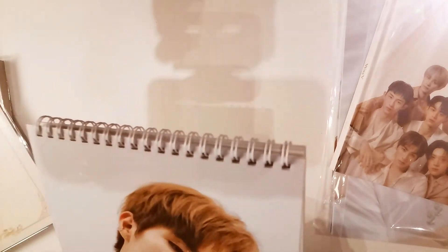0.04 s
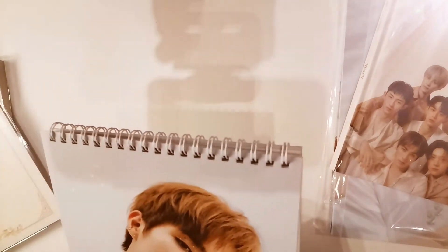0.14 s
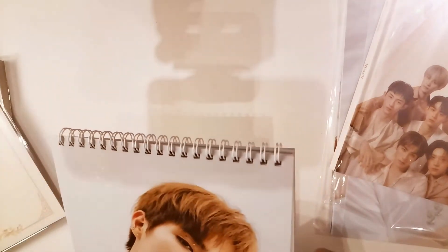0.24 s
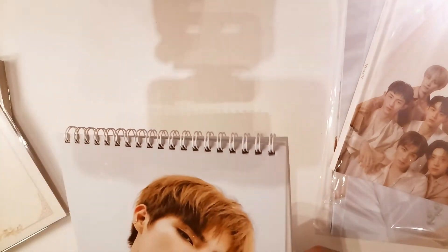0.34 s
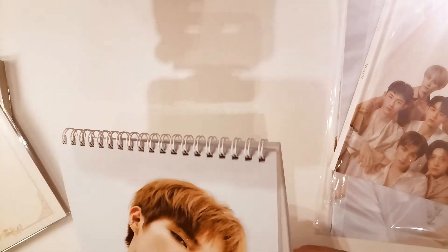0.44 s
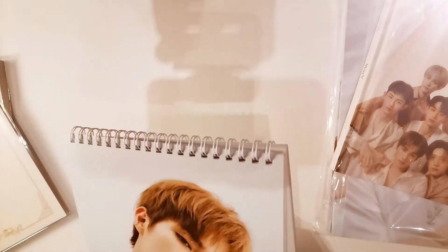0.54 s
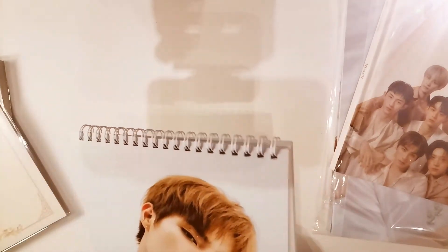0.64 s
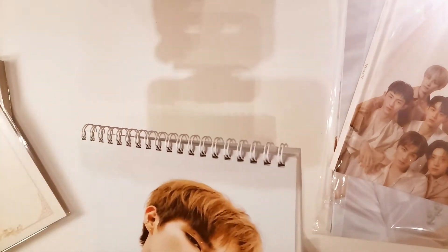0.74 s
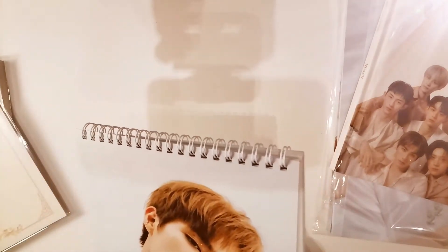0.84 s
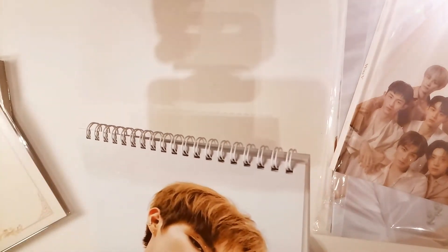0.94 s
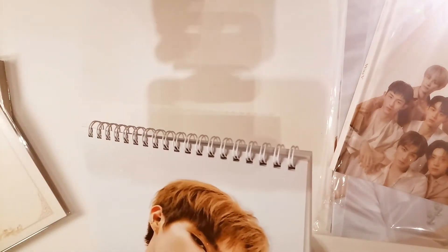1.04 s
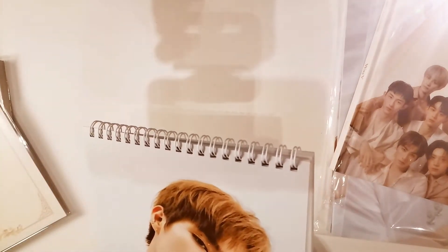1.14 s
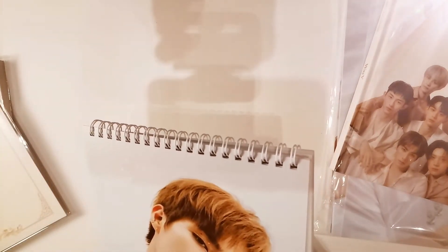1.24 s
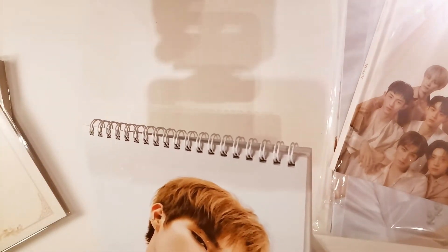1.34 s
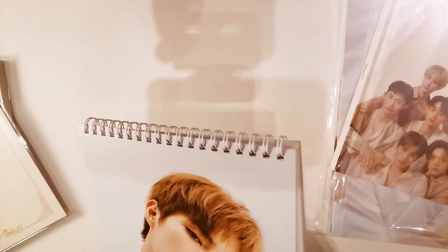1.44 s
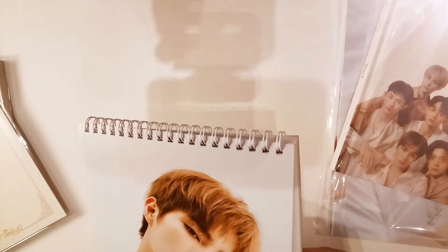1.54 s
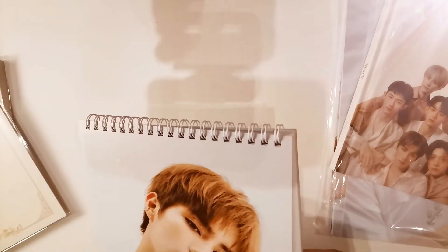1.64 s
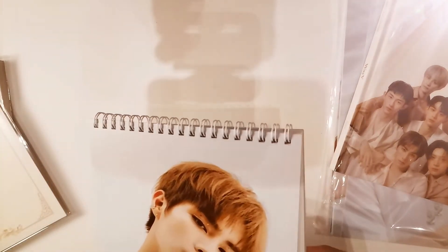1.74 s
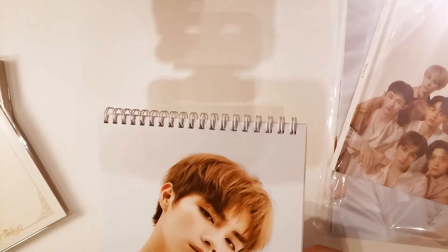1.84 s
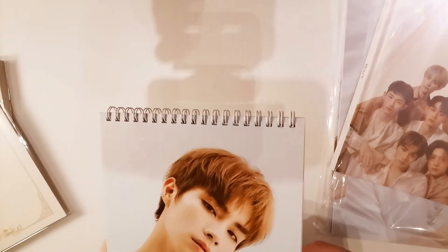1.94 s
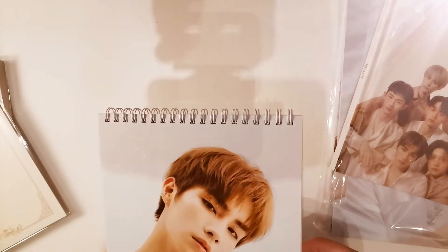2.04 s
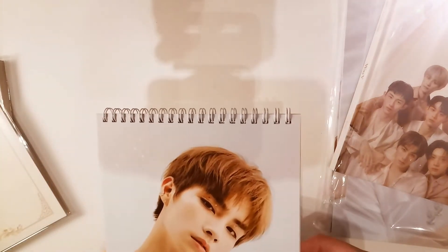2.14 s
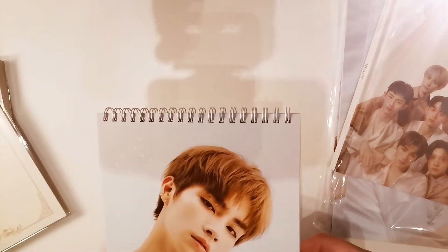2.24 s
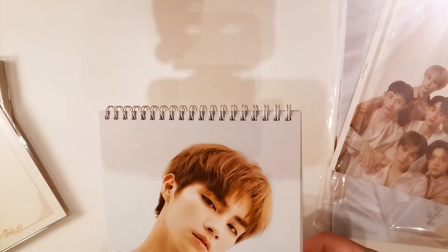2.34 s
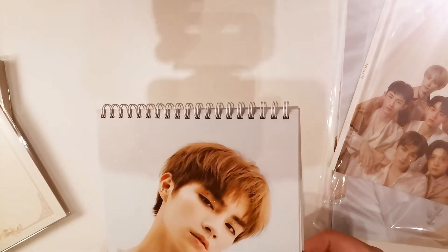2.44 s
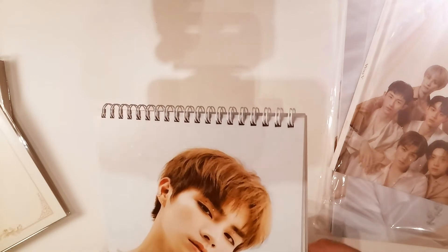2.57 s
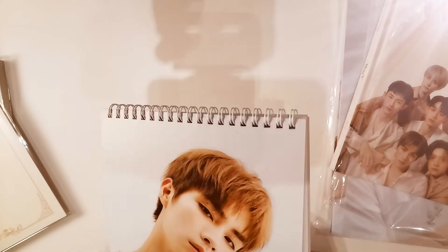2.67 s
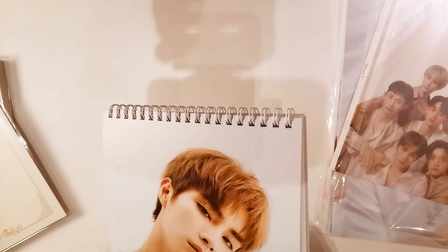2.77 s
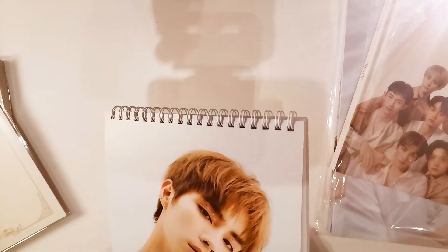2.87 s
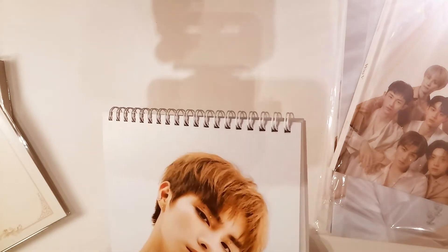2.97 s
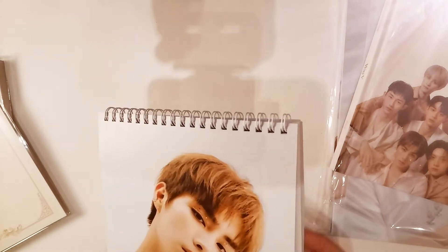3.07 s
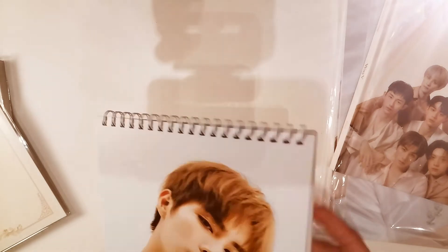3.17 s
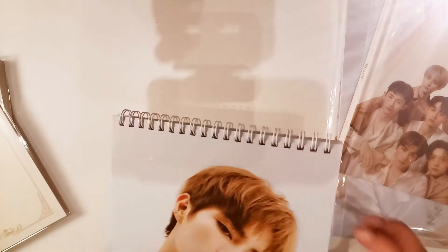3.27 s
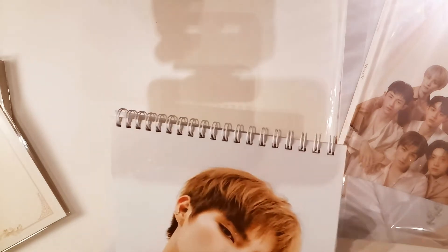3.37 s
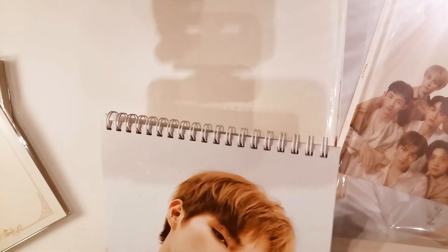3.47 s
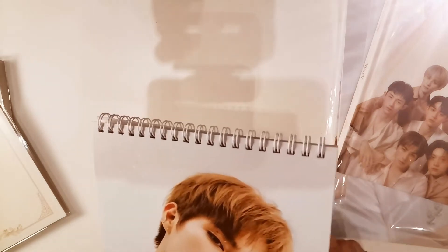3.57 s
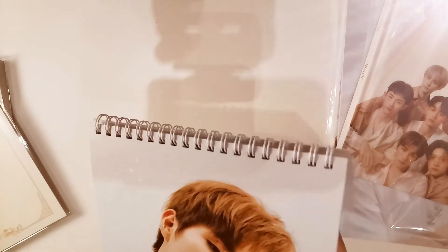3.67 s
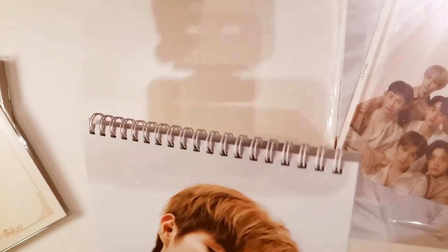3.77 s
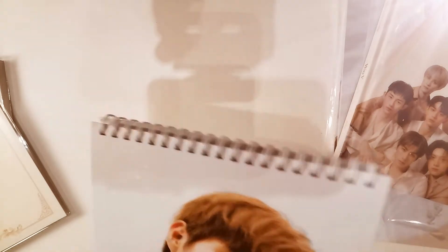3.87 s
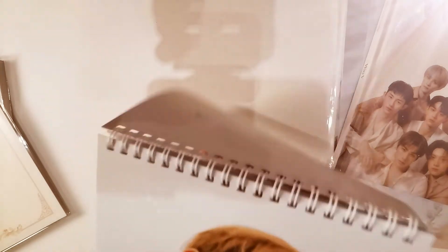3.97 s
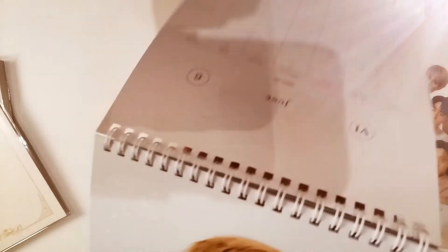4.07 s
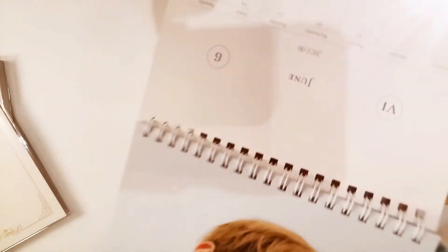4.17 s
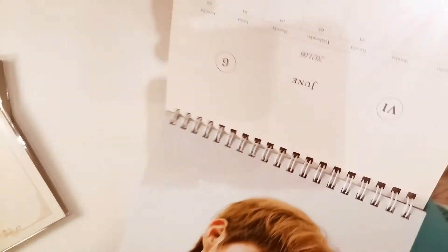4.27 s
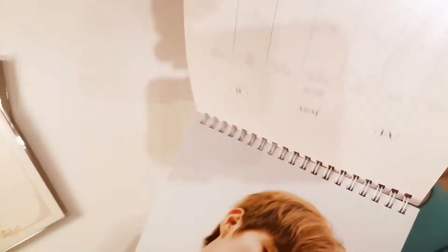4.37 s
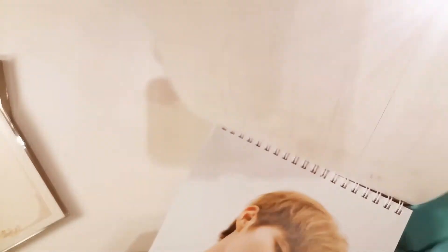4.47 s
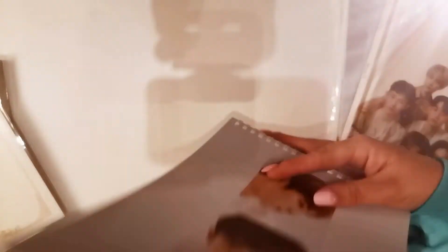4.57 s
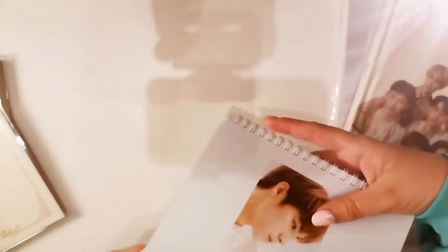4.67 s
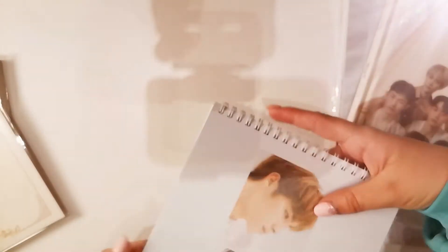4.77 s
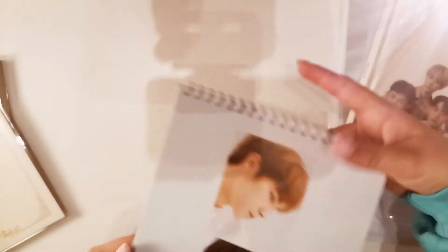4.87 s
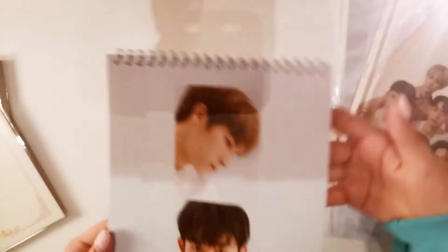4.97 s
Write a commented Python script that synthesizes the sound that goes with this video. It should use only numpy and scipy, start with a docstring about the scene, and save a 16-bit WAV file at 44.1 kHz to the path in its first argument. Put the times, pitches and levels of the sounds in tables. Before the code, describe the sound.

Close stereo microphones in a small room hear fingers softly rubbing and sliding along a wire-bound calendar, with sparse light ticks and one short metallic rasp. Near the end a stiff page turns: card scrapes, sharp ticks, quick judders and a crisp flap, then fading rustles and faint low air puffs over steady low rumble.

```python
"""Fingers and sheets slide with a soft hiss as a spiral-bound desk calendar is handled close by in a small
room; then one stiff page is turned over. Friction is grainy noise coloured by card and paper. The punched
edge ticks and scrapes along the wire loops as damped swings, noise bursts and ringing modes, among
narrow-band whistles and groans. The card judders and flaps; low puffs of air reach the microphone near the end.
Two microphone ports hear this with sparse reflections, over a steady low rumble and faint hiss."""
import sys
import numpy as np
from scipy import signal
from scipy.fft import rfft, irfft, next_fast_len
from scipy.io import wavfile
from scipy.ndimage import uniform_filter1d

SR = 44100
rng = np.random.default_rng(int(sys.argv[2]) if len(sys.argv) > 2 else 0)


def store_wav(level_fs):
    """Save 16-bit WAV to argv[1]."""
    pcm = np.round(np.clip(np.atleast_2d(level_fs), -1, 1) * 32767)
    wavfile.write(sys.argv[1], SR, pcm.T.astype(np.int16))


N = 221111
TIME = np.arange(N) / SR  # s

# Resonances of the card. Each row: frequency in Hz, width in Hz, relative level in dB.
CARD_MODES = [(310, 22, -51), (402.7, 17, 18.5), (521, 81, 3.5), (652, 150, 6), (894, 7.7, 19),
              (1055, 29, 7.5), (1145, 120, 0.5), (1260, 49, -7), (1667, 450, -1), (2010, 63, -19)]
# Spectrum of a paper crack. Each row: frequency in Hz, relative level in dB.
CRACK_COLOUR = [(400, -5.5), (1200, 12), (2200, 6.5), (3200, 10), (6000, 2.5), (9000, -11.5), (12000, -9),
                (16000, -37)]


def gesture(turn_pan_db=3.5, turn_edge_s=0.042, flex_below_db=-10, fade_power=1.2):
    """Independent motions add in power: port gains of rub, hiss and flexing, and the brightness of the hiss."""
    # The page is lifted, swings over the wire and falls behind. Each row: time in seconds, rub of the card,
    # surface hiss and low flexing in dB before the layer gains, brightness in dB per octave.
    turn_rows = [(3.622, -53.5, -60, -80, 2), (3.638, -43, -52, -52, 0), (3.68, -44, -54, -54.5, 1),
                 (3.71, -36, -49.5, -46, 3), (3.8, -37, -55, -39.5, -5), (3.87, -39.5, -44.5, -45, 0.5),
                 (3.96, -36, -54, -45, 3.5), (4.0, -41.5, -53, -60, 6.5), (4.05, -41.5, -42.5, -37, -3),
                 (4.09, -42, -61.5, -45.5, 0), (4.18, -45.5, -51, -42.5, 4.5),
                 (4.25, -45.5, -47.5, -34.5, -1), (4.3, -50, -51, -36.5, -2), (4.36, -52.5, -62, -40, 0),
                 (4.411, -46, -58, -44.5, 0), (4.54, -46.5, -59.5, -57.5, -0.5),
                 (4.622, -35, -47.5, -49.5, 0), (4.7, -56, -81, -50.5, 12), (4.75, -51.5, -58, -43, 1)]
    # Fingers shift their grip and slide along the sheets. Each row: crest, rise and fade in seconds, rub
    # and surface hiss in dB before the layer gains, brightness in dB per octave, left minus right in dB.
    stroke_rows = [(.005, .01, 0.031, -56.5, -53, -1, -1), (.09, .04, 0.034, -60.5, -54.5, 0.5, -7),
                   (.19, 0.021, 0.034, -51, -56.5, 1.5, -4.5), (.24, 0.014, 0.02, -45.5, -56, 1.5, -3),
                   (.31, 0.037, 0.036, -48.5, -53, -0.5, -2.5), (0.507, 0.045, 0.064, -46, -51, -1, -2),
                   (0.686, 0.056, 0.037, -51, -55.5, 2.5, -1), (.75, 0.027, 0.026, -68, -55, 6.5, -1.5),
                   (.85, 0.055, .07, -69, -69.5, 8.5, 1), (1.524, 0.054, 0.2, -59.5, -53.5, 2.5, 0),
                   (1.64, 0.066, 0.14, -55, -66, -9, -1), (1.8, 0.057, 0.083, -49, -49.5, 1, -1),
                   (1.9, 0.023, 0.06, -55, -73, -2, 4), (1.979, 0.021, 0.093, -54, -64.5, -1, 0),
                   (2.186, 0.02, 0.025, -47.5, -52, -4.5, 0.5),
                   (2.345, .012, 0.01, -57.5, -64.5, -0.5, -13), (2.485, .022, .03, -46.5, -51, -3.5, 0),
                   (2.54, 0.046, 0.064, -43, -61.5, -8, 1.5), (2.61, 0.045, 0.036, -78, -55.5, -1.5, 0),
                   (2.689, 0.048, 0.036, -47, -53.5, 6, 0), (2.82, 0.086, 0.16, -62, -63.5, 1, 0.5),
                   (2.926, 0.0055, 0.015, -75, -59.5, 6.5, -1), (3.147, 0.04, 0.078, -46, -53, -5, -1),
                   (3.295, 0.048, 0.079, -50, -49, 3, -1), (3.41, 0.06, 0.055, -51.5, -51.5, 1.5, 0),
                   (3.462, 0.016, 0.016, -51.5, -51, 3.5, 4), (4.02, 0.0089, 0.029, -57, -39, 0, 3),
                   (4.777, 0.024, 0.026, -43, -48.5, 1, 4), (4.84, 0.09, 0.061, -87, -58, 4.5, 7)]
    t = TIME[::64]  # motion is slow, so a coarse grid suffices

    times, *columns = np.transpose(turn_rows)
    rub_db, hiss_db, flex_db, bright = (np.interp(t, times, column) for column in columns)
    outside = abs(t - np.clip(t, times[0], times[-1]))
    turn_envelope = np.exp(-outside / turn_edge_s)
    moves = [(turn_envelope, rub_db, hiss_db, flex_db, bright, turn_pan_db)]

    for s, rise, fade, rub_db, hiss_db, bright, pan_db in stroke_rows:
        onset = ((t - s) / rise) ** 2
        decay = abs((t - s) / fade) ** fade_power
        envelope = np.exp(-np.where(t < s, onset, decay))
        # a stroke bends the sheet a little, in step with its rub
        moves.append((envelope, rub_db, hiss_db, rub_db + flex_below_db, bright, pan_db))

    power, tilt = 0, 0
    for envelope, *levels, bright, pan_db in moves:
        part = np.array([(envelope * amp(db) * pan(pan_db)) ** 2 for db in levels])
        hiss_power = part[1].sum(0)
        power = power + part
        tilt = tilt + bright * hiss_power
    gains = [np.array([np.interp(TIME, t, port) for port in layer]) for layer in np.sqrt(power)]
    mean_bright = tilt / (power[1].sum(0) + 1e-20)  # weighted by hiss power
    return *gains, np.interp(TIME, t, mean_bright)


def rubbing(rub, flex, rub_db=-2.33, flex_db=-3.5, modal=0.12, apart=0.39):
    """Stick-slip friction: fingers and edges excite the card, which rings and flexes."""
    # Spectra of rubbing and of slow flexing. Each row: frequency in Hz, relative level in dB.
    rub_colour = [(150, -65), (300, -12.5), (420, 2), (700, 3), (1100, 6), (1500, -1.5), (2200, -3.5),
                  (3500, -20.5), (8000, -38)]
    flex_colour = [(30, -32), (80, -8), (160, -8.5), (290, -7), (420, -10.5), (700, -18), (2000, -97)]
    common = grains(per_s=500, spread_db=8, smooth=0.88)
    difference = grains(per_s=450, spread_db=1.5, smooth=1.0)
    slips = common + apart * np.array([[1], [-1]]) * difference
    card = colour(slips + modal * ring(slips, CARD_MODES), rub_colour)
    card = patchy(card, depth_db=2.0, size=512)
    flexing = unit(colour(grains(per_s=200, spread_db=4, smooth=.6), flex_colour))
    return card * rub * amp(rub_db) + flexing * flex * amp(flex_db)


def hissing(hiss, bright, hiss_db=1.87, pivot_hz=4500):
    """Distributed friction: sheets slide over a wide area, so each port hears its own hiss of varying tilt."""
    # Spectrum of sliding paper. Each row: frequency in Hz, relative level in dB.
    hiss_colour = [(500, -59.5), (1300, -5.5), (2200, 4.5), (3300, 5.5), (4600, 4.5), (6500, -2.5),
                   (9000, -7.5), (11500, -10.5), (13500, -22), (16000, -38)]
    fibres = np.vstack([grains(per_s=1800, spread_db=5.5, smooth=1.0) for port in range(2)])
    surface = patchy(colour(fibres, hiss_colour), depth_db=3.0, size=256)
    hz, t, z = signal.stft(surface, SR, nperseg=256)
    octaves = np.clip(np.log2((hz + 1) / pivot_hz), -1, 1.8)
    tilt_db = octaves[:, None] * np.interp(t, TIME, bright)
    return signal.istft(z * amp(tilt_db), SR)[1][:, :N] * hiss * amp(hiss_db)


def crackling(rub, crackle_db=-14, per_s=110, spread_db=4):
    """Random impulses: the punched edge snags on single loops, in fine ticks scattered through the rubbing."""
    chance, size, side = rng.random(N), rng.exponential(1, N), rng.uniform(-1 / 2, 1 / 2, N)
    snags = unit((chance < per_s / SR) * amp(spread_db * np.minimum(size, 2)))
    snags = snags * np.array([1 + side, 1 - side])
    return colour(snags, CRACK_COLOUR) * rub * amp(crackle_db)


def ticking(swing_cycles=1.4, crack_db=3, flap_db=-2, thud_db=-22, crack_s=0.0023, thud_hz=270,
            thud_s=0.0026, after_db=-14, lowest_hz=130):
    """Sudden release of strain: crack, damped swings and thud; a flap is a dull swing of the whole sheet."""
    # The page catches and lets go. Each row: start in seconds, swing level in dB, pitch of the card in Hz,
    # crack level in dB before its gain, left minus right in dB.
    tick_rows = [(0.2797, -33.5, 910, -34.5, -4.5), (0.3075, -40, 990, -55, 5),
                 (0.875, -48.5, 1500, -47, 2), (1.8935, -46.5, 800, -50, 7), (2.16, -39, 1770, -43, -5),
                 (2.4777, -38.5, 920, -58, 5), (3.1695, -32.5, 1440, -46, -1),
                 (3.2612, -40, 1530, -34, 0.5), (3.3946, -29.5, 2300, -41, 3),
                 (3.4404, -47.5, 594, -40.5, 2), (3.6291, -23.5, 1330, -28.5, -2),
                 (3.662, -26, 1660, -34.5, -1), (3.689, -16.5, 1170, -20, 5.5), (3.7029, -21, 586, -26, 5),
                 (3.798, -23.5, 930, -30.5, 9), (3.8104, -23.5, 930, -33.5, -1),
                 (3.924, -32, 1310, -31.5, 4), (4.0471, -21.5, 1060, -32.5, 1), (4.106, -31, 1030, -52, 0),
                 (4.2539, -35, 1380, -26, -8), (4.2656, -16, 2010, -22, 8), (4.3768, -32, 1200, -30, 7),
                 (4.4134, -31.5, 690, -28, 10), (4.5161, -33, 1120, -43.5, 5), (4.6072, -47, 1070, -43, 10),
                 (4.6495, -41, 1000, -38, 0)]
    # The bent sheet pops through. Each row: start in seconds, level in dB before the flap gain,
    # pitch in Hz, decay time in seconds.
    flap_rows = [(3.259, -43.5, 410, 0.0018), (3.804, -33, 276, 0.0026), (4.047, -23, 266, 0.00334),
                 (4.241, -4.5, 428, 0.00029), (4.4138, -28.5, 270, 0.0018)]
    swings, cracks, thuds = np.zeros((3, 2, N))
    t = np.arange(SR // 20) / SR
    crack_decay = np.exp(-t / crack_s)
    thud = np.exp(-t / thud_s) * np.sin(2 * np.pi * thud_hz * t)
    for s, peak_db, hz, snap_db, pan_db in tick_rows:
        add(swings, s, amp(peak_db) * swing(hz, swing_cycles / hz), pan_db)
        add(cracks, s, amp(snap_db + crack_db) * crack_decay * rng.standard_normal(len(t)), pan_db)
        add(thuds, s, amp(peak_db + thud_db) * thud)
    for s, peak_db, hz, length in flap_rows:
        add(swings, s, amp(peak_db + flap_db) * swing(hz, length))
    after_ring = amp(after_db) * ring(swings, CARD_MODES)
    ticks = swings + after_ring + colour(cracks, CRACK_COLOUR) + thuds
    # an open sheet radiates hardly any deep bass
    return signal.sosfilt(signal.butter(2, lowest_hz, "highpass", fs=SR, output="sos"), ticks)


def swing(hz, length, echo_s=0.00276, echo=0.32):
    """Damped oscillation with one reflection: a released bend swings and returns from the far edge."""
    t = np.maximum(np.arange(SR // 20) / SR - np.array([[0], [echo_s]]), 0)
    u = t / max(length, 1 / SR)
    first, returned = np.sqrt(2 * u) * np.exp(.5 - u) * np.sin(2 * np.pi * hz * t)
    return first + echo * returned


def scraping(scrape_db=-3, modal=0.57, bump_hz=105, bump_s=0.014):
    """Forced modal ringing: a short rasp along the loops excites the wire, while the stand bumps dully."""
    # The calendar is jolted and its punched edge rasps on the wire. Each row: start in seconds,
    # rasp level in dB before its gains, length in seconds, bump of the stand in dB, left minus right in dB.
    scrape_rows = [(.651, -42.5, 0.0022, -42.5, -18), (2.16, -42, 0.002, -44.5, 17),
                   (2.3547, -33, 0.0034, -53, -15), (2.361, -14.5, 0.0023, -40.5, 5.5),
                   (2.701, -34.5, 0.0035, -70, 1.5), (3.757, -19, 0.0033, -66, -9),
                   (4.488, -40, 0.0013, -68, 11)]
    # Resonances of the wire binding. Each row: frequency in Hz, width in Hz, relative level in dB.
    wire_modes = [(1040, 93, 19), (2000, 63, 14), (2450, 50, 13), (3650, 490, 10), (4530, 100, 33.5),
                  (5870, 230, 11), (6300, 620, 11)]
    # Spectrum of the rasp. Each row: frequency in Hz, relative level in dB.
    rasp_colour = [(300, -7), (1000, 5), (3000, 10.5), (7000, 1), (9000, -5.5), (13000, -14), (16000, -40)]
    rasps, bumps = np.zeros((2, 2, N))
    t = np.arange(SR // 8) / SR
    bump = np.exp(-t / bump_s) * np.sin(2 * np.pi * bump_hz * t)
    for s, peak_db, length, bump_db, pan_db in scrape_rows:
        u = t / length
        stroke = u ** 2 * np.exp(1 - u ** 2)  # builds, then stops short as the edge slips free
        add(rasps, s, amp(peak_db + scrape_db) * stroke * rng.standard_normal(len(t)), pan_db)
        add(bumps, s, amp(bump_db) * bump)
    return colour(rasps + modal * ring(rasps, wire_modes), rasp_colour) / 2 + bumps


def juddering():
    """Brief bending oscillation: the stiff card judders for a few cycles."""
    # Each row: crest in seconds, peak level in dB, mean pitch in Hz, half length in seconds.
    judder_rows = [(3.119, -34.5, 1177, .004), (3.127, -25, 1100, 0.0021), (3.130, -31.5, 768, .0053),
                   (3.704, -21.5, 703, 0.0029), (3.709, -31, 480, 0.013), (3.717, -26, 624, 0.0034),
                   (3.733, -29, 640, 0.0052), (3.7415, -17, 970, 0.0026), (3.752, -20.5, 703, 0.0016),
                   (3.761, -22, 1010, 0.0017), (4.218, -34, 600, .004), (4.227, -31, 500, .005),
                   (4.26, -30, 440, 0.0044), (4.5187, -26, 844, 0.0024), (4.6282, -17, 984, 0.0015),
                   (4.959, -45, 1132, 0.0023)]
    return swells(judder_rows, waver=.05)


def squeaking(squeak_db=-2):
    """Narrow-band noise: fuzzy whistles or groans from skin, paper edges and, at 2.365 s, the ringing wire."""
    # Each row: crest in seconds, level in dB before the squeak gain, pitch in Hz, width in Hz,
    # rise in seconds, fade in seconds.
    squeak_rows = [(0.085, -47, 3950, 850, 0.046, 0.018), (.319, -48, 2530, 600, 0.043, 0.03),
                   (.654, -34.5, 4150, 1300, 0.0039, 0.0043), (0.736, -44.5, 1425, 383, 0.005, 0.037),
                   (1.81, -54.5, 422, 149, 0.021, 0.11), (2.167, -54, 1740, 350, 0.0049, 0.045),
                   (2.365, -35, 5530, 1500, 0.0033, 0.032), (2.705, -35, 3240, 600, .004, 0.0074),
                   (3.3, -63, 13600, 2400, .1, 0.1), (3.75, -36, 980, 328, .03, 0.1),
                   (4.487, -23, 3950, 600, 0.0014, 0.002), (4.87, -58, 8250, 900, 0.065, 0.053)]
    out = np.zeros((2, N))
    t = np.arange(-SR // 5, SR // 5) / SR
    f = np.fft.rfftfreq(len(t), 1 / SR)
    for s, db, hz, width, rise, fade in squeak_rows:
        band = 1 / (1 + (2 * (f - hz) / width) ** 2)
        envelope = amp(db + squeak_db) * np.exp(-np.where(t < 0, (t / rise) ** 2, t / fade))
        whistle = unit(irfft(rfft(rng.standard_normal(len(t))) * band, len(t)))
        add(out, s + t[0], (envelope * whistle)[t + s >= 0])
    return out


def puffing():
    """Displaced air: the page pushes slow pressure swings at the microphone."""
    # Each row: crest in seconds, peak level in dB, mean pitch in Hz, half length in seconds.
    puff_rows = [(4.28, -44, 96.7, .015), (4.355, -39, 110, 0.0068), (4.905, -40, 47.7, 0.02),
                 (4.95, -33.5, 69.4, 0.018)]
    return swells(puff_rows, waver=.15)


def ports(x):
    """Time and level differences: the page lies a little to the right, so the left port is late and shaded."""
    # Level difference of the ports. Each row: frequency in Hz, left minus right in dB.
    shade = [(60, -12.5), (200, -1), (700, 0.5), (2400, -1), (4400, 0), (8000, -3.5), (15000, -12.5)]
    lag_s = .00012
    size = next_fast_len(N + SR // 10)
    hz = np.fft.rfftfreq(size, 1 / SR)
    # each port takes half of the level difference and half of the lag
    left = amp(read(shade, hz) / 2) * np.exp(-1j * np.pi * hz * lag_s)
    return irfft(rfft(x, size) * np.array([left, 1 / left]), size)[:, :N]


def room(x, first_s=0.0025, build_s=0.00065):
    """Reverberation: sparse reflections from desk and walls, different at each port, decay band by band."""
    # Decay of the room. Each row: frequency in Hz, time to fall by 60 dB in seconds.
    decay_times = [(150, 0.3), (600, 0.19), (2000, 0.18), (6000, 0.15), (15000, 0.11)]
    # Colour and level of the reflections. Each row: frequency in Hz, gain on the normalised tail in dB.
    wet_gain = [(100, -15), (400, -16), (1000, -9.5), (2500, -10), (6000, -8.5), (15000, 5)]
    taps = rng.choice([-1., 1.], (2, SR // 2)) * (rng.random((2, SR // 2)) < 1 / 10)
    hz, t, z = signal.stft(taps, SR, nperseg=256)
    decay = np.exp(-np.log(1000) * t / read(decay_times, hz)[:, None])
    tail = signal.istft(z * decay, SR)[1]
    tail *= np.clip((np.arange(tail.shape[1]) / SR - first_s) / build_s, 0, 1)
    tail /= np.linalg.norm(tail, axis=1, keepdims=True)
    wet = amp(read(wet_gain, np.fft.rfftfreq(2 * SR, 1 / SR)))
    tail = irfft(rfft(tail, 2 * SR) * wet)[:, :SR // 2]
    return signal.oaconvolve(x, tail, axes=1)[:, :N]


def room_tone(tone_db=-54.5, shared=0.26):
    """Partly coherent stationary noise: steady low rumble and faint hiss, partly the same at both ports."""
    # Spectrum of the background. Each row: frequency in Hz, relative level in dB.
    quiet_colour = [(20, 5.5), (30, 1.5), (85, -5), (150, -8), (250, -12.5), (330, -17.5), (570, -20.5),
                    (1000, -20.5), (2000, -26), (4500, -29.5), (7000, -38), (10500, -44), (13200, -36.5),
                    (16000, -49)]
    noise = rng.standard_normal((2, N)) + shared * rng.standard_normal(N)
    return amp(tone_db) * unit(colour(noise, quiet_colour))


def grains(per_s, spread_db, smooth):
    """Friction as a random pulse train: tiny slips of uneven size over an even noise."""
    chance, size, noise = rng.random(N), rng.exponential(1, N), rng.standard_normal(N)
    sizes = amp(abs(spread_db) * np.minimum(size, np.pi))
    slips = (chance < per_s / SR) * rng.choice([-1, 1], N) * sizes
    return unit(unit(slips) + smooth * noise)[None]


def patchy(x, depth_db, size):
    """Time-varying resonance: the bending sheet's random patches of colour come and go."""
    z = signal.stft(x, SR, nperseg=size)[2]
    patches = rng.standard_normal(z.shape[1:])
    for axis, count in ((0, 3), (0, 2), (1, 14), (1, 6)):  # smooth over frequency, then time
        patches = uniform_filter1d(patches, count, axis)
    return unit(signal.istft(z * amp(depth_db * unit(patches)), SR)[1][:, :N])


def swells(rows, waver):
    """Frequency-modulated pulses: short oscillations swell and die while their pitch wavers by a share."""
    out = np.zeros((2, N))
    t = np.arange(-SR // 6, SR // 6) / SR
    for s, peak_db, hz, half in rows:
        drift = waver * unit(uniform_filter1d(rng.standard_normal(len(t)), size=60))
        turns = np.cumsum(hz * (1 + drift)) / SR
        envelope = np.exp(1 - np.hypot(1, t / half) ** 1.5)
        add(out, s + t[0], amp(peak_db) * envelope * np.cos(2 * np.pi * turns))
    return out


def ring(x, modes, size=4096):
    """Modal synthesis: a sum of exponentially damped modes, of unit energy."""
    t = np.arange(size) / SR
    taps = sum(amp(db) * width * np.exp(-np.pi * width * t) * np.cos(2 * np.pi * hz * t)
               for hz, width, db in modes)
    return signal.oaconvolve(x, taps[None] / np.linalg.norm(taps), axes=1)[:, :N]


def colour(x, points, size=2048):
    """Minimum-phase filtering: a causal filter of unit energy with the given spectrum."""
    log_gain = np.log(amp(read(points, abs(np.fft.fftfreq(size, 1 / SR)))))
    taps = np.fft.ifft(np.exp(np.conj(signal.hilbert(log_gain)))).real
    return signal.oaconvolve(x, taps[None] / np.linalg.norm(taps), axes=1)[:, :N]


def add(mix, s, sound, pan_db=0):
    """Superposition: lays a sound into both channels from a time in seconds."""
    part = mix[:, max(round(s * SR), 0):][:, :len(sound)]
    part += pan(pan_db) * sound[:part.shape[1]]


def pan(db):
    """Level-difference stereo: gains of left and right that differ by the given decibels."""
    return amp([[db / 2], [-db / 2]])


def read(points, hz):
    """Interpolates a table on a logarithmic frequency axis."""
    f, value = np.transpose(points)
    return np.interp(np.log(hz + 1), np.log(f + 1), value)


def amp(db):
    """Converts decibels to an amplitude ratio."""
    return 10 ** (np.asarray(db) / 20)


def unit(x):
    """Normalises to a root mean square of 1."""
    return x / np.sqrt(np.mean(x ** 2) + 1e-20)


def scene(wire_room_db=4):
    """Superposes direct sound, reflections and stirred air; the wire radiates mostly away from the ports."""
    rub, hiss, flex, bright = gesture()
    place = rub / np.sqrt(np.mean(rub ** 2, axis=0) + 1e-20)  # squeaks come from where the rubbing is
    sliding = rubbing(rub, flex) + hissing(hiss, bright) + crackling(rub) + place * squeaking()
    paper = sliding + ticking() + juddering()
    wire = scraping()
    reflections = room(paper + amp(wire_room_db) * wire)
    return ports(paper + wire + reflections + puffing()) + room_tone()


def record(dry, edge_hz=15950):
    """Linear filtering: the microphone's response, then a steep low-pass band limit."""
    # The microphone's treble has a trough. Each row: frequency in Hz, gain in dB.
    response = [(9400, -1), (10000, -9.5), (12400, -8), (13000, 3.5), (15000, 5.5), (16000, 15)]
    size = next_fast_len(N + SR // 10)
    gain = amp(read(response, np.fft.rfftfreq(size, 1 / SR)))
    heard = irfft(rfft(dry, size) * gain, size)[:, :N]
    low_pass = signal.firwin(511, edge_hz, window=("kaiser", 9), fs=SR)
    return signal.oaconvolve(heard, low_pass[None], "same")


dry = scene()
out = record(dry)
store_wav(out)
```